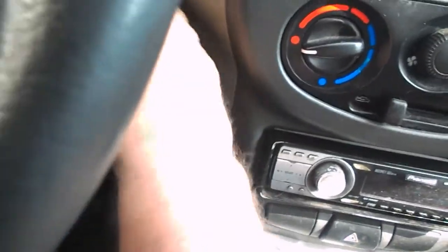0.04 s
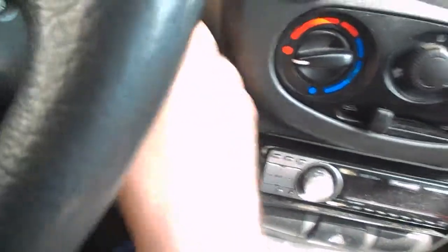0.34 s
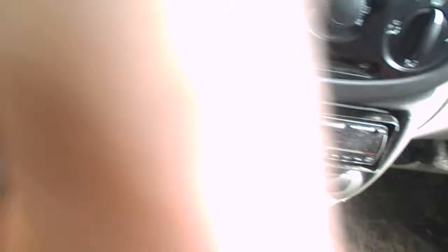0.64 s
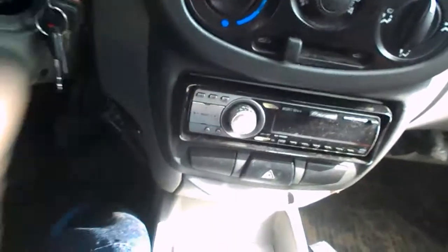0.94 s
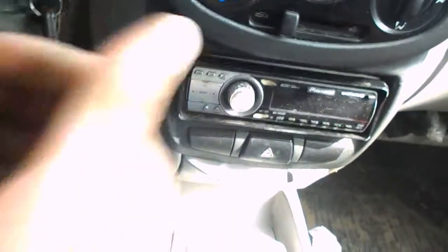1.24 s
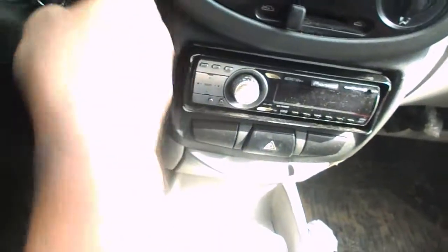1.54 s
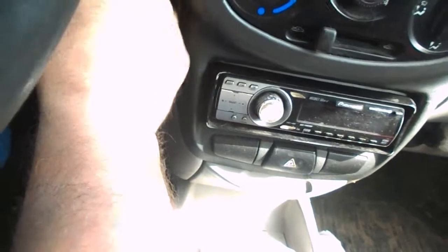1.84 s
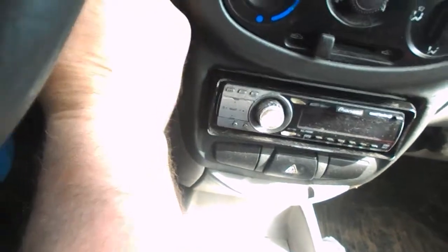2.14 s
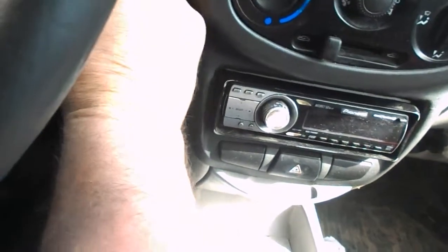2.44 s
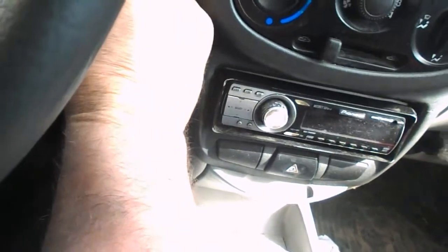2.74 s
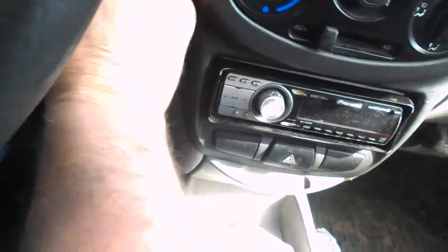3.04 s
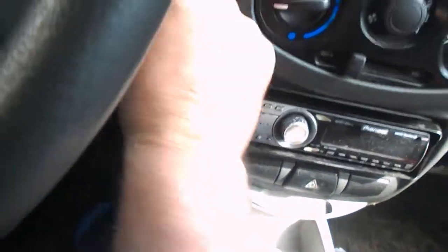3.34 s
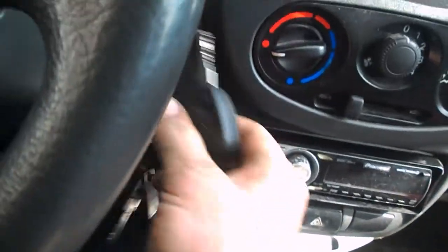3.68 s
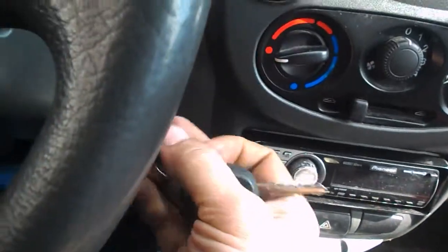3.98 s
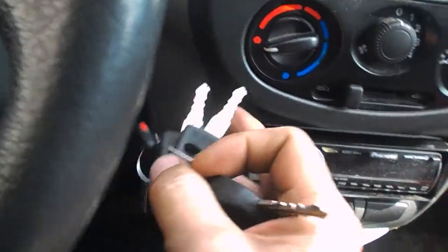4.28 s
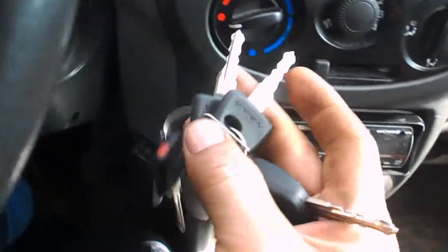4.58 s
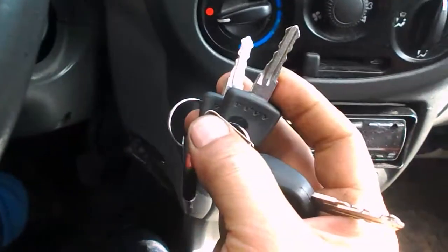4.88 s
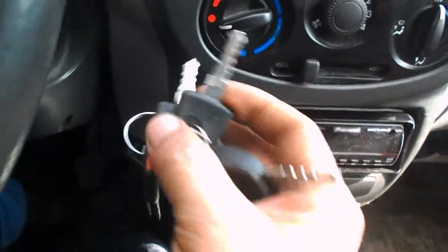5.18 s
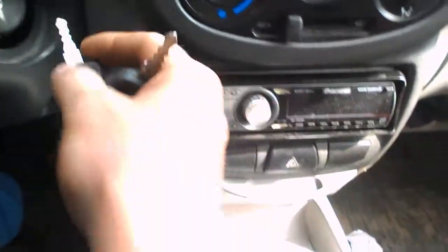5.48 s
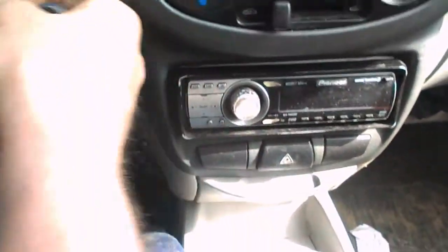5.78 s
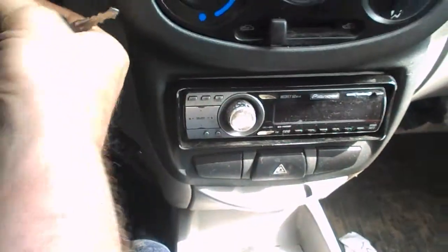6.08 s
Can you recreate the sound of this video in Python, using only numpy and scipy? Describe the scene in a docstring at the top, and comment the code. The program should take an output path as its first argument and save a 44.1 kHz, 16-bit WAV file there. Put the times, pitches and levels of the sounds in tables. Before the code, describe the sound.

Bursts of sharp clacks and gritty scraping come from a car's steering lock, followed by light jingling of keys.

```python
"""Inside a parked car with the engine off, a key is worked in the lock of a faulty steering column.
The lock knocks, scrapes and squeaks in bursts, and the plastic column rings with it. A hand bumps
the trim and a sleeve swishes. Then the key is drawn out, and the bunch jingles in the hand, metal
on metal, until it is brought back to the lock. Glass and dashboard add a very short echo."""
import sys
import numpy as np
from scipy import signal
from scipy.fft import rfft, irfft
from scipy.io import wavfile
from scipy.ndimage import uniform_filter1d, minimum_filter1d

SR = 44100
rng = np.random.default_rng(int(sys.argv[2]) if len(sys.argv) > 2 else 0)


def file_out(sig):
    """Save sig as 16-bit WAV at sys.argv[1]."""
    # one column per channel
    cols = np.atleast_2d(sig).T
    # limit, then scale
    lim = np.clip(cols, -1, 1)
    pcm = np.round(lim * 32767).astype(np.int16)
    wavfile.write(sys.argv[1], SR, pcm)


N = 274302
TIME = np.arange(N) / SR


def from_db(db):
    """Turn decibels (dB) into a number to multiply by."""
    return 10 ** (np.asarray(db) / 20)


def rms_one(x):
    """Scale a sound so that its average strength (rms) is 1."""
    return x / np.sqrt(np.mean(x ** 2) + 1e-20)


def colour(x, spectrum, size=4096):
    """Shape the bass and treble of a sound to follow a colour table."""
    hz, db = np.transpose(spectrum)
    grid = np.maximum(np.fft.rfftfreq(size, 1 / SR), 1)
    gains = from_db(np.interp(np.log(grid), np.log(hz), db))
    # build a minimum-phase filter: it never sounds before it is hit
    cepstrum = irfft(np.log(gains))
    cepstrum[1:size // 2] *= 2
    cepstrum[size // 2 + 1:] = 0
    pulse = irfft(np.exp(rfft(cepstrum)))
    return signal.fftconvolve(x, pulse / np.abs(pulse).max())[:N]


def band(x, edges_hz):
    """Keep what lies between two frequencies."""
    return signal.sosfilt(signal.butter(3, edges_hz, "band", fs=SR, output="sos"), x)


def hiss(spectrum):
    """Smooth noise with the given colour."""
    return rms_one(colour(rng.standard_normal(N), spectrum))


def grains(spectrum, per_s, spread_db):
    """Gritty noise: many tiny contacts of uneven size."""
    sizes = from_db(spread_db * np.minimum(rng.exponential(1, N), 4)) * rng.choice([-1, 1], N)
    touches = rng.random(N) < per_s / SR
    return rms_one(colour(sizes * touches, spectrum))


def strikes(starts, db):
    """One click at each start time."""
    out = np.zeros(N)
    out[np.round(starts * SR).astype(int)] = from_db(db)
    return out


def decays(starts, db, t60, rise_s, hz=None, bend=1):
    """Loudness curves, or tones if given hz, that fall 60 dB in the fade time of t60 seconds."""
    out, age = np.zeros(N + SR), TIME[:SR // 2]
    t60 = np.broadcast_to(t60, len(starts))
    for k, start in enumerate(starts):
        fade = from_db(db[k] - 60 * (age / t60[k]) ** bend)   # bend over 1: hold, then drop
        shape = fade * (1 - np.exp(-age / rise_s))
        at = round(start * SR)
        out[at:at + len(age)] += shape if hz is None else shape * np.sin(2 * np.pi * hz[k] * age)
    return out[:N]


def resonance(x, hz, width_hz):
    """Pick out a narrow range around one pitch; the narrower, the longer it rings."""
    r = np.exp(-np.pi * width_hz / SR)
    feedback = [1, -2 * r * np.cos(2 * np.pi * hz / SR), r * r]
    return signal.lfilter(np.array([1, 0, -1]) * (1 - r * r) / 2, feedback, x + 1e-18)


def ring(clicks, hz, t60):
    """Each click starts a pure tone that fades."""
    r, w = from_db(-60 / (t60 * SR)), 2 * np.pi * hz / SR
    return signal.lfilter([0, np.sin(w)], [1, -2 * r * np.cos(w), r * r], clicks + 1e-18)


def struck(tones, starts, db, pitch_hz, near_db=14, near_octaves=0.071):
    """A blow rings all of an object's tones, a little by chance, favouring those near its own pitch."""
    luck_db = rng.normal(0, 2.0, (len(starts), len(tones)))
    out = 0
    for k, (hz, tone_db, t60) in enumerate(tones):
        near = np.exp(-(np.log2(pitch_hz / hz) / near_octaves) ** 2)
        blows = strikes(starts, db + tone_db + near_db * near + luck_db[:, k])
        out = out + ring(blows, hz, t60)
    return out


# The colour of the background noise. Each row: frequency in Hz, relative level in dB.
AIR_COLOUR = [(15, -43.5), (25, -17.5), (59, -3), (116, -8.5), (155, -7.5), (328, -8), (437, -7.5),
              (674, -12), (878, -10.5), (1090, -11.5), (1170, -13.5), (3990, -12), (7110, -7.5),
              (7830, -9.5), (10200, -33.5), (17200, -120)]
# Its rumble, middle and hiss. Each row: lower edge in Hz, upper edge in Hz.
AIR_BANDS = [(20, 200), (200, 2400), (2400, 9000)]
# Sweeps of the arm. Each row: middle in seconds, half-length in seconds, hiss in dB, rumble in dB.
SWISHES = [(0.8, 0.26, -54, -52), (1.28, 0.055, -40.5, -57), (1.55, 0.26, -44, -49.5),
           (2.9, 0.12, -41.5, -59.5), (3.729, 0.19, -42, -70), (4.397, 0.3, -48.5, -82),
           (4.866, 0.044, -46, -66), (5.62, 0.27, -47, -78), (5.806, 0.11, -40.5, -52.5),
           (6.12, 0.13, -41.5, -61)]
def air_and_sleeve(floor_db=(-62, -57.5, -51.5), rustle_db=-12.5, flutter_db=4, flutter_s=0.043):
    """Faint steady rumble and hiss; over it the sleeve swells, flutters and fades as the arm sweeps."""
    wander = np.interp(TIME / flutter_s, np.arange(1000), rng.standard_normal(1000))
    flutter = from_db(flutter_db * wander)
    power = from_db(floor_db)[:, None] ** 2   # one row for each band
    for middle, half_s, hiss_db, rumble_db in SWISHES:
        swell = np.exp(-((TIME - middle) / half_s) ** 2) * flutter ** 2
        power = power + swell * from_db([rumble_db, hiss_db + rustle_db, hiss_db])[:, None] ** 2
    noise = hiss(AIR_COLOUR)
    return sum(level * rms_one(band(noise, edges)) for edges, level in zip(AIR_BANDS, np.sqrt(power)))


# The low, middle and high part of a rattle. Each row: lower edge in Hz, upper edge in Hz.
RATTLE_BANDS = [(120, 1000), (1000, 4000), (4000, 9000)]
# The same three parts. Each row: gain in dB, share of the brightness, multiplier of the fade time.
RATTLE_SHAPE = [(-18.5, -0.67, 1.47), (-7, 0.058, 0.79), (-6.5, 1.0, 0.51)]
def rattle(grit, starts, db, bright_db, t60, rise_s):
    """Shaken loose parts chatter on, then settle abruptly, the treble first."""
    out = 0
    for edges, (gain_db, share, stretch) in zip(RATTLE_BANDS, RATTLE_SHAPE):
        loudness = decays(starts, db + gain_db + share * bright_db, t60 * stretch, rise_s, bend=1.4)
        out = out + rms_one(band(grit, edges)) * loudness
    return out


# The colour of contacts in the lock. Each row: frequency in Hz, relative level in dB.
LOCK_COLOUR = [(59, -56.5), (100, -2), (346, -17.5), (400, -19), (463, -12), (717, -9), (1660, -2),
               (2110, 0), (5050, -5.5), (6770, -7), (7830, -11.5), (10200, -20), (17200, -120)]
# Knocks of the lock. Each row: start in seconds, crack level in dB, clack pitch in Hz,
# ring level in dB, brightness in dB, base fade time in seconds.
KNOCKS = [(0.1045, -7, 2540, -20, -2.5, 0.087), (0.135, -23, 4040, -39.5, 14, 0.08),
          (0.36, 13, 2386, -3.5, 3, 0.063), (0.3827, 9.5, 2270, -6.5, -4, 0.17),
          (0.437, -5, 1820, -9.5, 3.5, 0.15), (0.4572, 3.5, 2960, -9, -1, 0.12),
          (0.4974, 5.5, 2950, -2.5, -4.5, 0.025), (0.5037, 2, 1910, -8.5, -7.5, 0.045),
          (0.516, -27, 1170, -10, -4, 0.084), (0.684, 1, 2030, -14, -3.5, 0.11),
          (0.6932, -16, 2080, -15.5, -5, 0.093), (0.7713, -16, 2050, -29, -9.5, 0.14),
          (0.818, -17, 1216, -24.5, -18.5, 0.1), (1.0613, -21, 4300, -42, 12.5, 0.34),
          (1.334, -33, 1200, -35, -18, 0.091), (1.7564, -22.5, 900, -31.5, -23, 0.073),
          (1.9317, -13, 2070, -19, 0, 0.14), (2.154, 6, 1210, -8.5, -3.5, 0.087),
          (2.1603, -14, 2130, -15, -10.5, 0.16), (2.2212, -20, 3020, -28.5, 7.5, 0.12),
          (2.2403, -9, 4320, -20, -3, 0.13), (2.4628, -18, 2960, -17.5, 5, 0.12),
          (2.468, 1, 2170, -11, 1.5, 0.1), (2.4828, -4, 2950, -12.5, -0.5, 0.092),
          (2.586, -14, 2200, -18, 2, 0.1), (2.6215, -6, 2100, -10.5, 2.5, 0.13),
          (2.768, -37, 2030, -33.5, 8.5, 0.056), (2.8406, 6, 1140, -14, -13, 0.064),
          (2.858, -5.5, 1580, -33.5, -13, 0.29), (2.9137, -16, 1600, -24, 6.5, 0.094),
          (3.0063, -13.5, 3620, -21, 3.5, 0.053), (3.0562, 1, 3090, -7, -2.5, 0.12),
          (3.119, -2, 3300, -13.5, 6.5, 0.14), (3.4093, -8, 2140, -14.5, 4, 0.11),
          (3.4769, -13, 747, -12, 5, 0.091), (3.4826, -15, 990, -11.5, -4, 0.067),
          (5.972, -21, 3100, -31, 11, 0.086), (6.015, -14.5, 2330, -30, 13.5, 0.048),
          (6.1145, -12.5, 4330, -33, -7, 0.15)]
def knocks():
    """Each knock is a click, an instant of hard chatter, then the rattle of loose parts."""
    starts, crack_db, _, ring_db, bright_db, t60 = np.transpose(KNOCKS)
    click = colour(strikes(starts, crack_db - 8), LOCK_COLOUR)
    chatter = hiss(LOCK_COLOUR) * decays(starts, crack_db - 11.5, t60=0.01, rise_s=0.00005)
    grit = grains(LOCK_COLOUR, per_s=7000, spread_db=1.0)
    return click + chatter + rattle(grit, starts, ring_db, bright_db, t60, rise_s=0.00015)


def swell_before_knocks(gain_db=-15, swell_s=0.06):
    """A faint, short gritty swell leads into each knock."""
    starts, _, _, ring_db, _, _ = np.transpose(KNOCKS)
    clicks = strikes(starts, ring_db + gain_db)
    fade = from_db(-60 / (swell_s * SR))
    swell = signal.lfilter([1], [1, -fade], clicks[::-1] + 1e-18)[::-1]   # a fade run backwards
    return swell * grains(LOCK_COLOUR, per_s=3700, spread_db=6.0)


# Tones of the lock housing. Each row: pitch in Hz, relative level in dB, fade time in seconds.
HOUSING_TONES = [(749.6, -27, 0.22), (985, -21, 0.16), (1218, -20, 0.17), (2124, -18, 0.14),
                 (2290, -24.5, 0.09), (2620, -18, 0.04), (3015, -16.5, 0.07), (5150, -22, 0.069)]
def housing():
    """At each knock the part that is hit gives a hollow clack and the housing rings on, with little bass."""
    starts, crack_db, pitch_hz, ring_db, _, _ = np.transpose(KNOCKS)
    clack_db = (crack_db + ring_db) / 2 - 2
    clacks = decays(starts, clack_db, t60=0.014, rise_s=0.00038, hz=pitch_hz)
    ringing = struck(HOUSING_TONES, starts, ring_db, pitch_hz)
    return band(clacks + ringing, edges_hz=(350, 9000))


# Pitches the column boosts or weakens. Each row: pitch in Hz, width in Hz, gain in dB.
COLUMN_RESONANCES = [(395, 15, 10), (470, 58, -14), (595, 44, 4), (643, 12, -5.5), (730.6, 8.8, 11),
                     (824, 12, 6.5), (985, 9.4, 0.5), (1157, 12, 5), (1364, 30, 6.5), (1475, 40, 8.5),
                     (1650, 30, 7), (1780, 25, 8), (1940, 35, 6), (2100, 40, 4.5), (2360, 51, 2.5),
                     (2770, 220, -2), (2980, 97, 5), (3360, 240, 1), (3920, 69, -1), (4220, 80, 4),
                     (5020, 360, -8), (5110, 26, 4.5), (6020, 31, 6.5), (6030, 41, 2), (7220, 140, 9.5),
                     (7210, 82, -3.5)]
def column(x, bass_edge_hz=355):
    """The column and its plastic cover ring with whatever shakes them, but give off little bass."""
    for hz, width_hz, db in COLUMN_RESONANCES:
        x = x + (from_db(db) - 1) * resonance(x, hz, width_hz)
    return signal.sosfilt(signal.butter(2, bass_edge_hz, "high", fs=SR, output="sos"), x)


# Turns of the key. Each row: start in seconds, end in seconds, level in dB.
TURNS = [(0.132, 0.218, -35), (2.372, 2.69, -25.5), (3.105, 3.462, -21.5)]
def scrape(gain_db=-9, edge_s=0.007):
    """While the key is turned, its teeth grind over the tumblers inside the lock."""
    effort = 0
    for start, end, db in TURNS:
        turning = (np.tanh((TIME - start) / edge_s) - np.tanh((TIME - end) / edge_s)) / 2
        effort = effort + from_db(db + gain_db) * turning
    return effort * grains(LOCK_COLOUR, per_s=2500, spread_db=2.5)


# The colours of a panel's thud and of rubbing skin. Each row: frequency in Hz, relative level in dB.
THUD_COLOUR = [(24, -49.5), (40, -54), (107, 7.5), (167, -6.5), (242, 1), (304, -2), (377, -5),
               (600, -17.5), (780, -54.5), (1320, -120)]
RUB_COLOUR = [(240, -27), (400, 5.5), (840, 3.5), (1280, -3.5), (2960, -6), (4710, -14.5), (7000, -29),
              (9100, -46.5), (15400, -120)]
# Bumps on the trim. Each row: start in seconds, thud in dB, rub in dB, thud's fade time in seconds.
BUMPS = [(0.2, -40, -35.5, 0.15), (0.912, -31, -26.5, 0.45), (1.067, -24, -41, 0.21),
         (1.225, -31, -30.5, 0.39), (1.33, -25, -24.5, 0.21), (1.543, -42.5, -43.5, 0.38),
         (1.806, -32.5, -27, 0.21), (1.984, -34.5, -38, 0.24), (2.915, -38, -27.5, 0.15),
         (3.28, -31.5, -50, 0.27), (3.349, -37, -41, 0.9), (5.778, -24, -23.5, 0.088)]
def bumps():
    """Hand or arm meets the trim: a tap, a dull thud and a rub of skin. The panel booms briefly."""
    starts, thud_db, rub_db, t60 = np.transpose(BUMPS)
    tap = colour(strikes(starts, rub_db + 3.5), RUB_COLOUR)
    thud = hiss(THUD_COLOUR) * decays(starts, thud_db - 4.5, t60, rise_s=0.0019)
    skin = grains(RUB_COLOUR, per_s=4100, spread_db=3.5)
    rub = skin * decays(starts, rub_db - 8, t60 * 1.76, rise_s=0.0066)
    contact = tap + thud + rub
    boom = from_db(12) * resonance(contact, hz=310.4, width_hz=7.6)
    return contact + boom


# Rasps of the sticking key. Each row: start in seconds, level in dB, brightness in dB,
# base fade time in seconds, squeak pitch in Hz.
RASPS = [(0.336, -24, 2, 0.24, 2330), (1.911, -27, -18, 0.14, 1203), (2.136, -18.5, 0.5, 0.13, 2080),
         (2.26, -20.5, -2, 0.4, 2590), (2.42, -22.5, -4.5, 0.54, 4330), (2.634, -9.5, 3.5, 0.1, 2600),
         (3.156, -11, -1, 0.17, 3326), (3.192, -11, 2.5, 0.11, 2240), (3.258, -17.5, -17.5, 0.16, 1330),
         (3.267, -14.5, 10.5, 0.15, 6030), (3.345, -11, -3.5, 0.21, 2930), (3.377, -13, -3.5, 0.21, 5360)]
def rasps():
    """The key sticks in the lock and grinds in short, gritty swells."""
    starts, db, bright_db, t60, _ = np.transpose(RASPS)
    grit = grains(LOCK_COLOUR, per_s=3500, spread_db=3.5)
    return rattle(grit, starts, db, bright_db, t60, rise_s=0.004)


def squeaks():
    """Each rasp sets one metal part singing."""
    starts, db, _, _, pitch_hz = np.transpose(RASPS)
    return decays(starts, db - 5.5, t60=0.14, rise_s=0.0027, hz=pitch_hz)


# The colour of key hitting key. Each row: frequency in Hz, relative level in dB.
CLASH_COLOUR = [(470, -59), (800, -41), (1170, -36.5), (2440, -15.5), (2770, -14.5), (4250, -8),
                (5290, -11.5), (6470, -1.5), (7830, -3), (10200, -39.5), (17200, -120)]
# The keys' weaker tones. Each row: pitch in Hz, relative level in dB, fade time in seconds.
KEY_TONES = [(2510, -25, 0.16), (3350, -26, 0.08), (5840, -17.5, 0.072), (6030, -22, 0.12),
             (6557, -17.5, 0.089), (7100, -24.5, .06)]
# Chinks of the keys. Each row: start in seconds, clash level in dB, ring level in dB, pitch in Hz.
CHINKS = [(0.414, -29, -16, 6562), (0.518, -24, -17, 6470), (0.6062, -31, -19.5, 7220),
          (2.4265, -26, -40.5, 5830), (2.5065, -15, -33, 6847), (2.5684, -29, -24, 7100),
          (2.6989, -33.5, -41, 6546), (2.912, -37, -18.5, 6450), (3.4162, -15, -17, 6630),
          (3.7261, -32, -34.5, 6570), (3.854, -36, -52, 7140), (3.9868, -30, -30, 6570),
          (4.0646, -32, -42, 5860), (4.1, -35.5, -48, 7300), (4.1284, -33.5, -35, 6340),
          (4.331, -38.5, -34.5, 6559), (4.6517, -49, -31, 6180), (4.7598, -30, -42, 6200),
          (4.7723, -25, -32, 2408), (4.7797, -35, -21.5, 6670), (4.8022, -29, -21.5, 6770),
          (4.8163, -35, -25.5, 6570), (4.824, -45, -27, 6300), (4.9229, -24.5, -24.5, 6550),
          (5.1247, -44, -46, 5750), (5.496, -51, -36, 6630), (5.6084, -37, -30, 6551),
          (5.6263, -29, -25.5, 6510), (5.755, -38, -28.5, 6540), (5.8258, -28, -23.5, 6490),
          (5.8378, -33, -41, 6580), (5.9598, -18, -22, 6740), (5.9713, -20, -37, 6554),
          (6.005, -20, -21, 5870), (6.0144, -28, -29, 6130), (6.0678, -27, -14, 6559)]
def keys(ring_gain_db=2):
    """Metal ticks on metal, chatters for an instant and rings until the fingers damp it."""
    starts, clash_db, ring_db, pitch_hz = np.transpose(CHINKS)
    ticks = colour(strikes(starts, clash_db + 14), CLASH_COLOUR)
    chatter = grains(CLASH_COLOUR, per_s=6500, spread_db=1.0)
    clash = chatter * decays(starts, clash_db + 2.5, t60=0.053, rise_s=0.00094)
    main_tone = decays(starts, ring_db + ring_gain_db, t60=0.063, rise_s=0.0007, hz=pitch_hz)
    weaker_tones = struck(KEY_TONES, starts, ring_db + ring_gain_db, pitch_hz)
    return ticks + clash + main_tone + weaker_tones


def cabin(x, t60=0.1, echo_db=-12):
    """Sound bounces off glass and dashboard in a dense, short echo."""
    age = TIME[:SR // 3]
    tail = rng.standard_normal(len(age)) * from_db(-60 * age / t60) * (age > 0.003)
    echo = signal.fftconvolve(x, tail / np.linalg.norm(tail))[:N]
    return x + from_db(echo_db) * echo


def scene():
    """Lock, hand and keys in the small cabin, as one channel."""
    lock = knocks() + rasps() + scrape()
    trim = bumps()
    bunch = keys()
    sources = column(lock + swell_before_knocks()) + housing() + squeaks() + trim + bunch
    return (cabin(sources) + air_and_sleeve())[None]


def record(dry, ceiling=1.0, cutoff_hz=8000):
    """A narrow band of treble is dipped, a fast limiter holds down loud knocks, and the top is cut."""
    heard = dry - 0.9 * resonance(dry, hz=7550, width_hz=310)
    gain = minimum_filter1d(ceiling / np.maximum(np.abs(heard), ceiling), size=11)
    limited = heard * uniform_filter1d(gain, size=11)
    return signal.sosfilt(signal.ellip(12, 0.2, 70, cutoff_hz, fs=SR, output="sos"), limited)


dry = scene()
out = record(dry)
file_out(out)
```